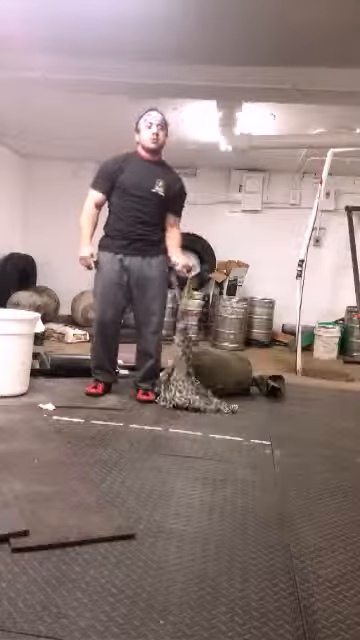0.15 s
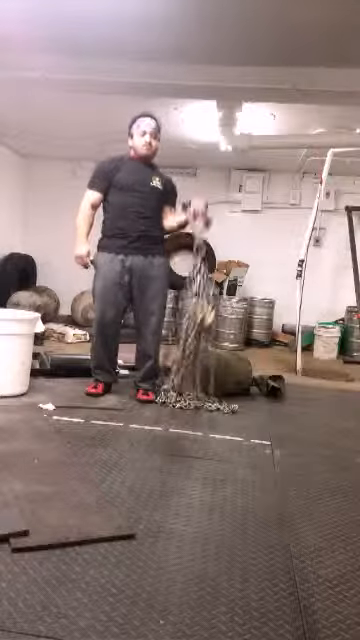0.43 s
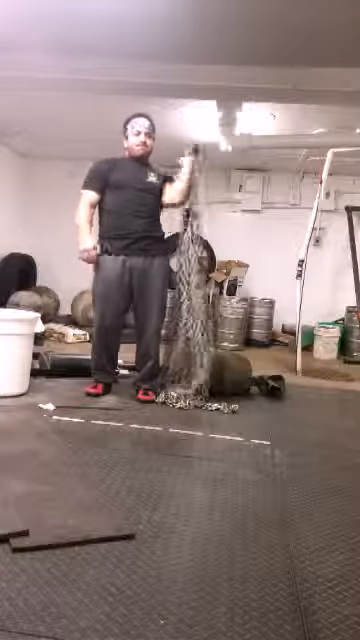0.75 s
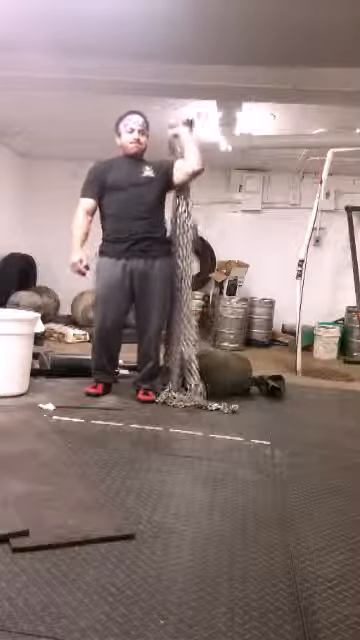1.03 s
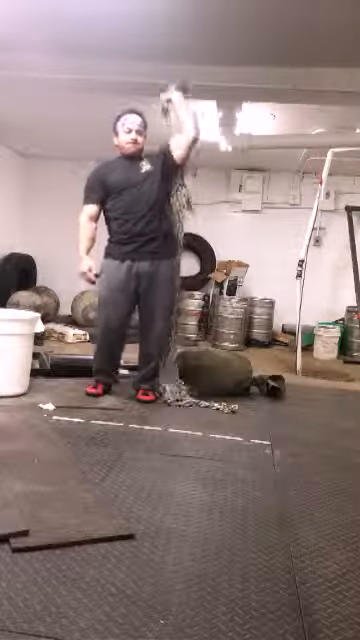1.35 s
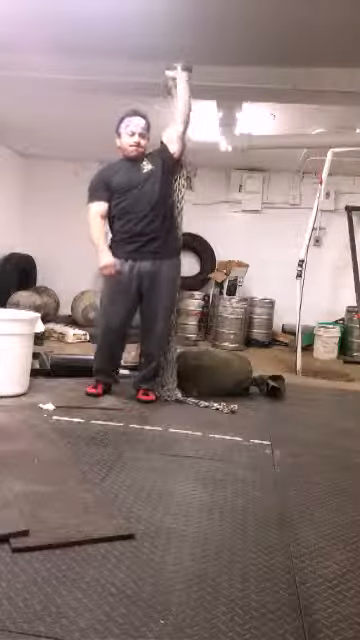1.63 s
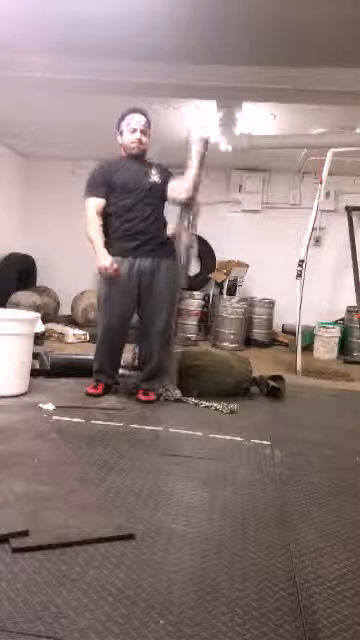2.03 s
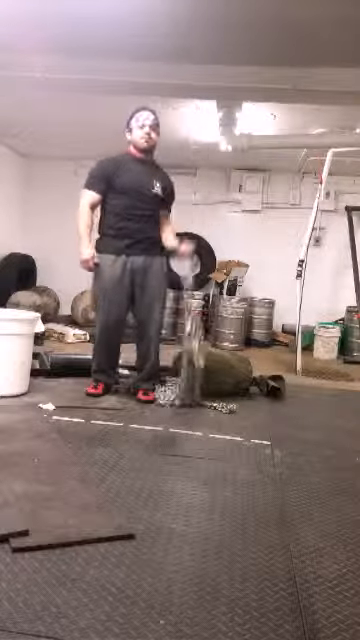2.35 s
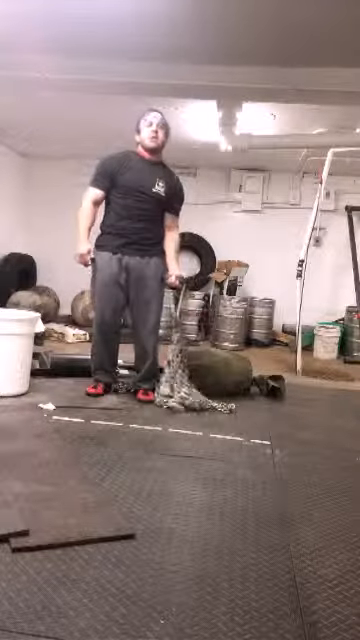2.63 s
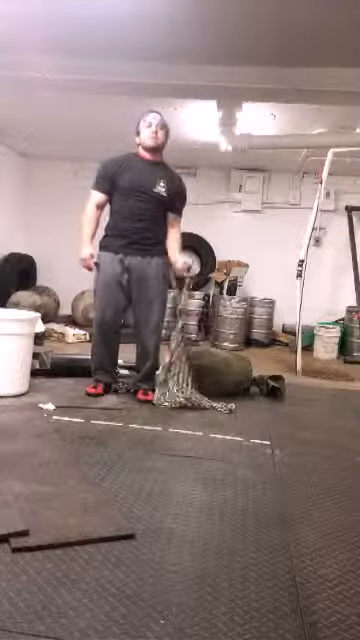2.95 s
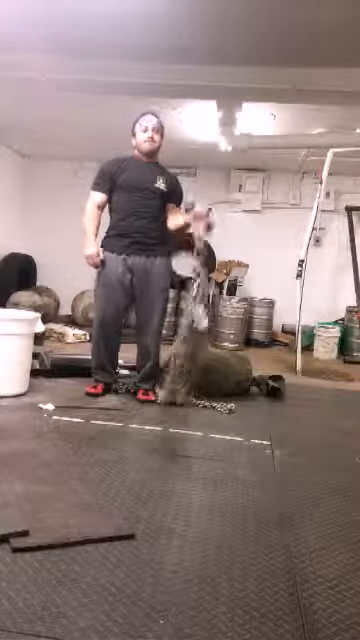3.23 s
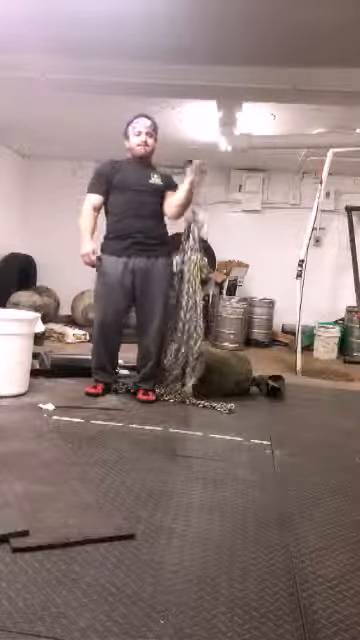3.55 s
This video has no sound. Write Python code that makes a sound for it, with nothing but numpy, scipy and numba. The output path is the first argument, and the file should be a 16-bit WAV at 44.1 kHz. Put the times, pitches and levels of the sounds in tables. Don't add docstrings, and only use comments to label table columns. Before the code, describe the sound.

Heavy steel chain rattles in bright bursts as it is lifted and dropped in a basement

```python
import sys
import numpy as np
from scipy import signal
from scipy.fft import rfft, irfft
from scipy.io import wavfile
from scipy.ndimage import uniform_filter1d
from numba import njit

SR = 44100
rng = np.random.default_rng(int(sys.argv[2]) if len(sys.argv) > 2 else 0)


def attenuation_scalar(level_db):
    decades = np.asarray(level_db, float) / 20
    return 10 ** decades


def unload_wav(signal):
    wavfile.write(
        sys.argv[1],
        SR,
        np.round(np.clip(np.atleast_2d(signal).T, -1, 1) * 32767).astype(np.int16),
    )


N = 163170
KNOCKS_PER_S = 1000


def curve(table, at, log=False, col=1):
    tab = np.array(table, float)
    if log:
        return np.interp(np.log(at + 1), np.log(tab[:, 0]), tab[:, col])
    return np.interp(at, tab[:, 0], tab[:, col])


def unit(x):
    return x / np.sqrt(np.mean(x ** 2))


def colour(x, gain):
    return irfft(rfft(x) * gain(np.fft.rfftfreq(x.shape[-1], 1 / SR)), x.shape[-1])


def walk(rate):
    return unit(signal.sosfilt(signal.butter(2, rate, fs=SR, output="sos"), rng.standard_normal(N)))


# f/Hz, density/dB per Hz
AIR = [(35, -4), (60, -6.5), (372, 1), (422, 9.5), (955, 0), (1390, -8), (5220, 6), (9500, -23),
       (11200, -17), (19800, -59)]
AIR_DB, AIR_WANDER_DB = -44, 3.6
HISS_HZ, HISS_WIDTH_HZ, HISS_DB = 13600, 1500, -59


def air():
    hum = unit(colour(rng.standard_normal((2, N)), lambda f: attenuation_scalar(curve(AIR, f, log=True))))
    hiss = rng.standard_normal((2, N))
    hiss = unit(colour(hiss, lambda f: np.exp(-((f - HISS_HZ) / HISS_WIDTH_HZ) ** 2)))
    return attenuation_scalar(AIR_DB + AIR_WANDER_DB * walk(2)) * hum + attenuation_scalar(HISS_DB) * hiss


# t/s, knock level/dB, heap share level/dB (links landing on or dragging over the pile)
MOTION = [(0.0, -9, 0), (0.21, -21, -6.5), (0.6, -85.5, -1.5), (0.665, -26.5, -5.5), (0.75, -20, -6.5),
          (1.49, -28.5, -4.5), (1.7, -15.5, -8), (1.92, -23.5, -6), (2.13, -62.5, -10), (2.24, -49.5, 9),
          (2.33, -10, -6.5), (2.55, -5.5, -5), (2.88, -7.5, -3.5), (3.35, -84, -37), (3.48, -46.5, 12.5),
          (3.515, -21.5, -4), (3.6, -16, -7.5), (3.7, -22, -6.5)]


def motion():
    t = np.arange(N) / SR
    return curve(MOTION, t), curve(MOTION, t, col=2)


@njit
def grains(start, hz, decay, left, right, size):
    out = np.zeros((2, size))
    for k in range(len(start)):
        p, z = np.exp(2j * np.pi * hz[k] / SR - decay[k]), 1 + 0j
        for i in range(start[k], min(size, start[k] + int(4 / decay[k]))):
            out[0, i] += left[k] * z.imag
            out[1, i] += right[k] * z.imag
            z *= p
    return out


def links(modes, level_db, flutter_db=1):
    knock_spread_db, loudest_knock, flutter_hz = 2.5, 3.5, 10
    count = KNOCKS_PER_S * N // SR
    start = rng.integers(0, N, count)
    force = attenuation_scalar(knock_spread_db * np.minimum(rng.exponential(size=count), loudest_knock))
    force = unit(force) * attenuation_scalar(level_db + flutter_db * walk(flutter_hz))[start]
    out = 0
    for hz, scatter_hz, db, t60 in modes:
        detune, left, right = rng.standard_normal((3, count))
        decay = np.full(count, np.log(1000) / (max(t60, .004) * SR))
        size = force * attenuation_scalar(db) * np.sqrt(4 * decay * SR / KNOCKS_PER_S)
        pitch = np.clip(hz + scatter_hz * detune, 30, 16500)
        out = out + grains(start, pitch, decay, size * left, size * right, N)
    return out / np.sqrt(sum(attenuation_scalar(2 * m[2]) for m in modes))


# f/Hz, scatter between links/Hz, level/dB, t60/s
LINK = [(12915, 25, -3, .1), (13350, 110, -1, .04), (13815, 55, 0, .05), (14110, 80, 0, .05),
        (14460, 110, -3, .04), (15170, 130, -7, .04)]


def hanging_rings(knock_db):
    return links(LINK, knock_db)


# f/Hz, scatter/Hz, level/dB, t60/s
CLANK = [(2455, 400, -8.5, 0.06), (3197, 300, -5, 0.045), (3912, 240, -4.5, 0.031),
         (4382, 260, -2.5, 0.027), (5265, 330, -3.5, 0.033), (6092, 400, -0.5, 0.03), (7190, 580, -1, 0.03),
         (8674, 500, -1, 0.03), (9730, 500, 2, 0.016), (11420, 968, 1, 0.063)]


def clanks(heap_knock_db):
    return links(CLANK, heap_knock_db - 3.5)


# f/Hz, scatter/Hz, level/dB, t60/s
MAT = [(99.5, 17.5, -12, 0.15), (267, 14, -8.5, 0.028), (398, 6.6, -5.5, 0.03), (537.8, 43.5, -2.5, 0.14),
       (697, 64, -1, 0.03), (890, 143, -4.5, 0.035), (1496, 365, -2.5, 0.014)]


def mat(heap_knock_db):
    return links(MAT, heap_knock_db - 14, flutter_db=2)


# f/Hz, t60/s
ROOM = [(100, 0.23), (500, 1.33), (2000, 0.53), (5000, 0.7), (9000, 0.44), (14000, 0.31)]
ROOM_DB, ROOM_GAP_S = 1, 0.0076


def basement(x):
    size = 50000
    t, tail = np.arange(size) / SR, 0
    for hz in 60 * 2 ** np.arange(0, 8.5, .5):
        noise = rng.standard_normal((2, size))
        band = colour(noise, lambda f: np.exp(-(np.log2((f + 1) / hz) / .3) ** 2))
        t60 = curve(ROOM, hz, log=True)
        tail = tail + band * attenuation_scalar(-60 * t / t60) * (t > ROOM_GAP_S) * np.sqrt(14 / t60 / SR) * 1.2
    early = np.concatenate([x[:, size // 4::-1], x], axis=1)
    echoes = signal.fftconvolve(early, tail, axes=1)
    return attenuation_scalar(ROOM_DB) * echoes[:, size // 4 + 1:size // 4 + 1 + N]


# t/s, peak level/dB, f/Hz
CLUNKS = [(0.632, -52, 470), (0.672, -33, 430), (0.772, -23, 720), (0.804, -31.5, 672), (0.998, -28.5, 496),
          (1.094, -28, 753), (1.153, -41.5, 649), (1.259, -27.5, 802), (1.358, -29.5, 660),
          (1.439, -38.5, 576), (1.547, -25.5, 434), (1.643, -38.5, 470), (1.708, -31.5, 373),
          (1.839, -46.5, 484), (1.903, -31, 401), (2.032, -27.5, 431)]
CLUNK_DB, CLUNK_T60_S, CLUNK_PUSH_S = -5, 0.1, 0.0056
CLUNK_RISE, CLUNK_UPPER = 0.034, 1.47


def clunks():
    t, out = np.arange(N) / SR, 0
    for (at, db, hz), pan in zip(CLUNKS, rng.standard_normal((len(CLUNKS), 2))):
        age = np.clip(t - at, 0, 1)
        turn = 2 * np.pi * hz * age * (1 + CLUNK_RISE * age / CLUNK_T60_S)
        ring = (np.sin(turn) + 0.21 * np.sin(CLUNK_UPPER * turn)) * attenuation_scalar(-60 * age / CLUNK_T60_S)
        push = 1 - np.exp(-age / CLUNK_PUSH_S)
        out = out + attenuation_scalar(db + CLUNK_DB + 2 * pan[:, None]) * push * ring
    return out


def shuffle():
    at_s, length_s, centre_hz, level_db = 2.163, 0.11, 126, -47
    swell = np.exp(-((np.arange(N) / SR - at_s) / length_s) ** 2)
    noise = rng.standard_normal(N)
    rumble = unit(colour(noise, lambda f: np.exp(-(np.log2((f + 1) / centre_hz) / 2.2) ** 2)))
    return attenuation_scalar(level_db) * swell * rumble


# t/s, level/dB
THUDS = [
    (2.333, -13),
    (2.566, -28),
    (2.667, -28.5),
]
# f/Hz, level/dB, t60/s
THUD_MODES = [(407, -7, 0.27), (441, -6, 0.12), (312, 1, 0.036), (690, -9, 0.074)]
THUD_PUSH_S = 0.015


def thuds():
    t, out = np.arange(N) / SR, 0
    for hz, db, t60 in THUD_MODES:
        for at, blow_db in THUDS:
            age = np.clip(t - at, 0, 2)
            push = 1 - np.exp(-age / THUD_PUSH_S)
            ring = attenuation_scalar(-60 * age / t60) * np.sin(2 * np.pi * hz * age)
            out = out + attenuation_scalar(db + blow_db) * push * ring
    return 3 * out * np.ones((2, 1))


def scene():
    knock_db, heap_db = motion()
    chain = hanging_rings(knock_db) + clanks(knock_db + heap_db) + mat(knock_db + heap_db)
    chain = chain + clunks() + thuds()
    return chain + basement(chain) + air() + shuffle()


# f/Hz, left minus right level/dB
MICS = [(100, 5.5), (500, -3), (1500, 3.5), (4000, 2), (10000, -1.5), (12400, 5.5), (14000, 11)]
DRIVE_DB = 1


def microphones(x):
    side = np.array([[.5], [-.5]])
    return attenuation_scalar(DRIVE_DB) * colour(x, lambda f: attenuation_scalar(side * curve(MICS, f, log=True)))


LIMIT, LIMIT_S, LIMIT_ABOVE_HZ = .43, .01, 12300
CEILING, LOPSIDED = .95, 0.15


def overload(x):
    top = colour(x, lambda f: .5 + .5 * np.tanh((f - LIMIT_ABOVE_HZ) / 300))
    top_power = uniform_filter1d(top ** 2, int(LIMIT_S * SR))
    x = x - top + top / np.sqrt(1 + top_power / LIMIT ** 2)
    x = x / (1 + (x / CEILING) ** 6) ** (1 / 6)
    return x + LOPSIDED * x ** 2


# f/Hz, level under the loudest sound/dB, level of the quietest sound kept/dB
MUTE = [(60, -39, -81), (230, -47, -71), (600, -43.5, -82), (1730, -44.5, -80), (3060, -54.5, -78.5),
        (7240, -42.5, -94), (10000, -46, -92), (11100, -41.5, -82), (13700, -47.5, -90),
        (15600, -33.5, -97)]
# from t/s, to t/s, from f/Hz, to f/Hz, level/dB
STARVED = [(0.27, .4, 1103, 2300, 6), (.26, .43, 6, 170, 10), (.5, .62, 2, 170, 14),
           (.57, .62, 1200, 2300, 5), (.62, .71, 1050, 1900, 8), (.87, 1.03, 1100, 1800, 1),
           (1.05, 1.091, 850, 2000, 10), (1.05, 1.1, 0, 300, 10), (1.17, 1.2, 1200, 1600, 13),
           (1.25, 1.32, 1050, 1500, 12), (1.28, 1.33, 0, 250, 14), (1.4, 1.5, 1200, 1900, 4.5),
           (1.51, 1.602, 1100, 1800, 3), (1.75, 1.947, 1050, 1900, 4.5), (1.76, 2.0, 0, 200, 9.5),
           (1.95, 2.09, 1050, 1850, 12), (3.06, 3.13, 1100, 2700, 16), (3.06, 3.137, -5, 220, 16),
           (3.2, 3.24, 3, 200, 14), (3.446, 3.531, 1104, 2000, 8.5)]
MUTE_CHANCE_DB, MUTE_FRAME_DB, MUTE_DEPTH_DB = 2, 2.5, -55
GAP_FROM_HZ, GAP_TO_HZ, GAP_DB = 2600, 12000, -60
GAP_RARITY, GAP_IN_VALLEYS, WEAK_SHARE = 1.55, .2, .55


def starve(x):
    f, t, spec = signal.stft(x, SR, nperseg=2048, noverlap=1024)
    line_power = abs(spec) ** 2
    edges = np.unique(np.round(8 * 1.09 ** np.arange(56) - 8)).astype(int)
    width = np.diff(edges, append=len(f))
    power = np.add.reduceat(line_power, edges, axis=1) / width[:, None]
    total_db = 10 * np.log10(line_power.sum(axis=1, keepdims=True).mean(axis=0) + 1e-12)

    mid = f[edges] + 30
    under_loudest = total_db + curve(MUTE, mid, log=True)[:, None]
    limit = np.maximum(under_loudest, curve(MUTE, mid, log=True, col=2)[:, None])
    limit = limit + MUTE_FRAME_DB * rng.standard_normal((2, 1, power.shape[2]))
    chance = uniform_filter1d(rng.standard_normal(power.shape), size=3) * np.sqrt(3)
    limit = limit + MUTE_CHANCE_DB * chance
    for a, b, lo_hz, hi_hz, db in STARVED:
        limit = limit + db * ((t > a) & (t < b)) * ((mid > lo_hz) & (mid < hi_hz))[:, None]
    muted = .5 - .5 * np.tanh(10 * np.log10(power + 1e-14) - limit)
    gain = np.repeat(attenuation_scalar(MUTE_DEPTH_DB * muted), width, axis=1)

    luck = uniform_filter1d(rng.standard_normal((len(f) // 16, len(t))), size=2) * np.sqrt(2)
    sliver_power = line_power[:, :-1].sum(axis=0).reshape(len(luck), -1, len(t)).sum(axis=1)
    sliver_db = 10 * np.log10(sliver_power + 1e-14)
    relief_db = sliver_db - uniform_filter1d(sliver_db, size=5, axis=0)
    luck = luck - GAP_IN_VALLEYS * uniform_filter1d(relief_db, size=2)
    line = np.arange(len(f))
    slivers = (luck > GAP_RARITY)[line // 16 % len(luck)] & (line % 16 < 11)[:, None]
    weak = line_power < WEAK_SHARE * uniform_filter1d(line_power, size=15, axis=1)
    gaps = (weak | slivers) * ((f > GAP_FROM_HZ) & (f < GAP_TO_HZ))[:, None]
    gain = gain * attenuation_scalar(GAP_DB * gaps)
    return signal.istft(spec * gain, SR, nperseg=2048, noverlap=1024)[1][:, :N]


# t/s, length/s, level/dB
DROPOUTS = [
    (0.968, 0.011, -10),
    (1.07, 0.033, -4.5),
    (1.133, 0.02, -11.5),
    (1.241, 0.017, -27),
    (1.303, 0.017, -3.5),
    (3.092, 0.013, -0.5),
]


def dropouts(x):
    t = np.arange(N) / SR
    lost_db = sum(db * np.exp(-((t - at) / length) ** 2) for at, length, db in DROPOUTS)
    return x + (attenuation_scalar(lost_db) - 1) * colour(x, lambda f: f < 2700)


# closes t/s, opens t/s, level/dB
GATE = [
    (0.548, 0.626, -10.5),
    (3.354, 3.501, -12),
]
GATE_SLEW_S = 0.033


def gate(x):
    t = np.arange(N) / SR
    shut_db = sum(db * ((t > a) & (t < b)) for a, b, db in GATE)
    return x * attenuation_scalar(uniform_filter1d(shut_db * 1., int(GATE_SLEW_S * SR)))


def top_cut(x):
    return signal.sosfilt(signal.butter(12, 15780, fs=SR, output="sos"), x)


def record(dry):
    x = overload(microphones(dry))
    x = dropouts(starve(x))
    mix = gate(x)
    return top_cut(mix)


dry = scene()
out = record(dry)
unload_wav(out)
```